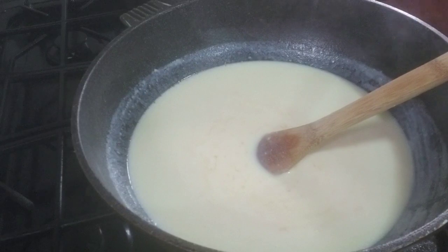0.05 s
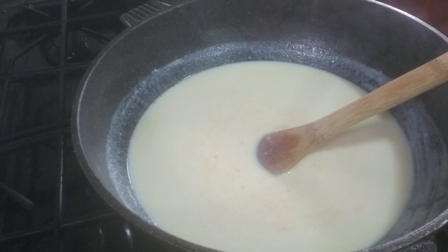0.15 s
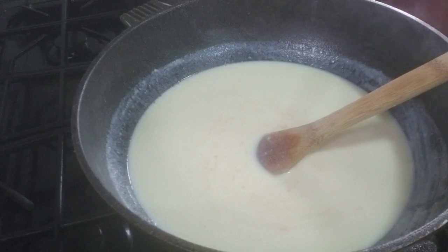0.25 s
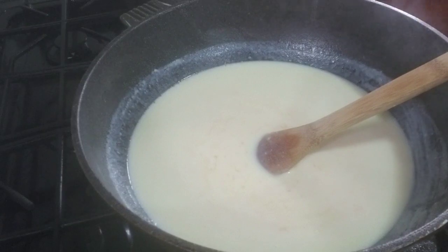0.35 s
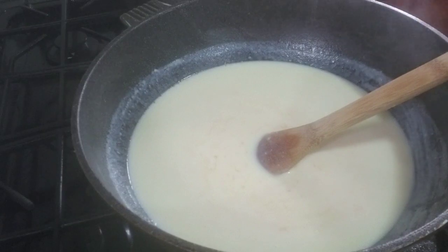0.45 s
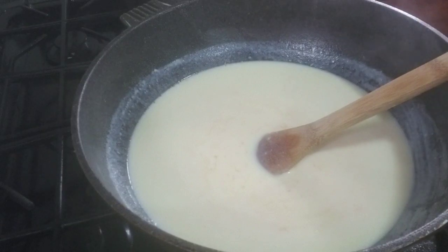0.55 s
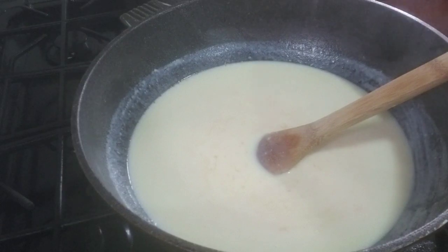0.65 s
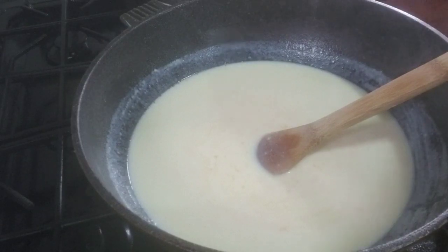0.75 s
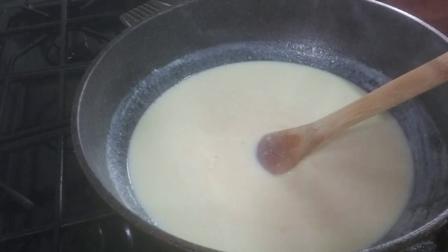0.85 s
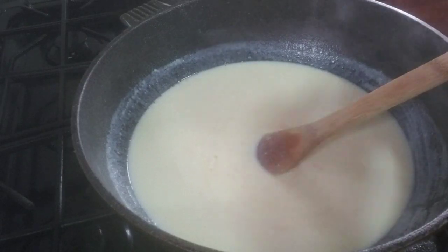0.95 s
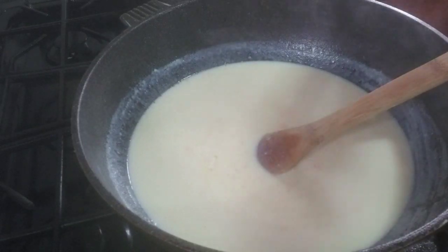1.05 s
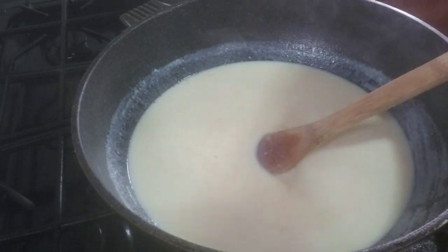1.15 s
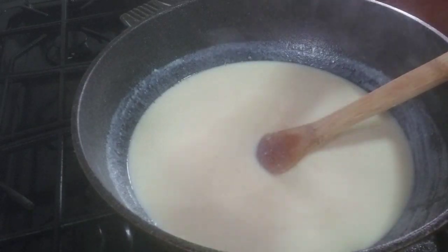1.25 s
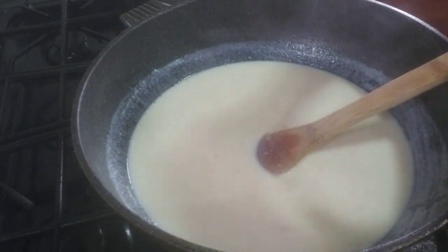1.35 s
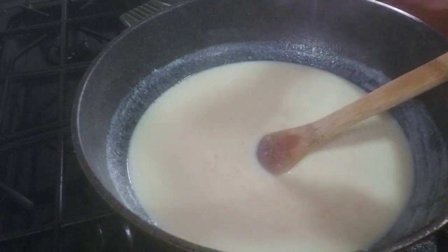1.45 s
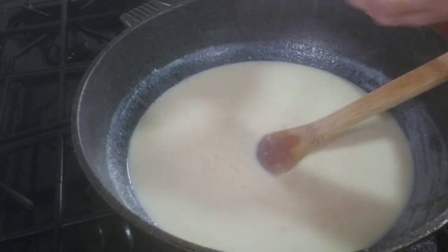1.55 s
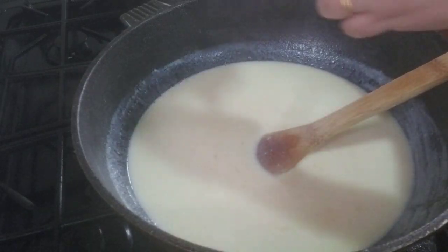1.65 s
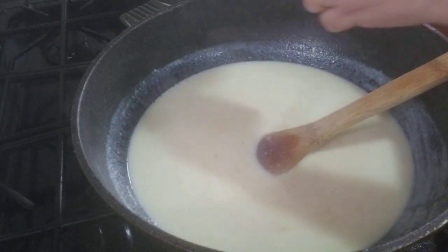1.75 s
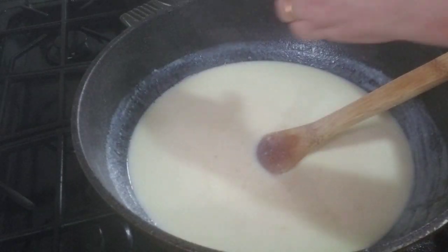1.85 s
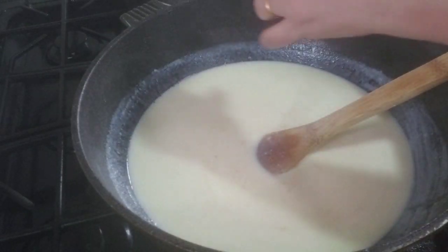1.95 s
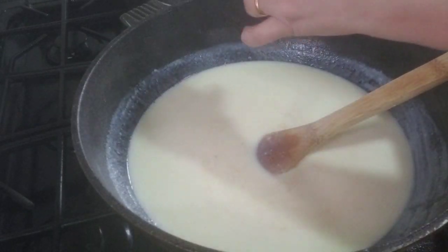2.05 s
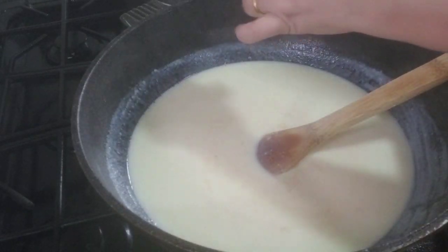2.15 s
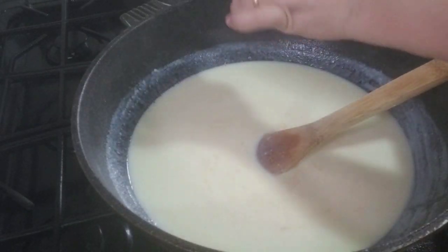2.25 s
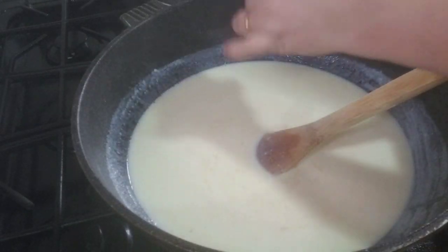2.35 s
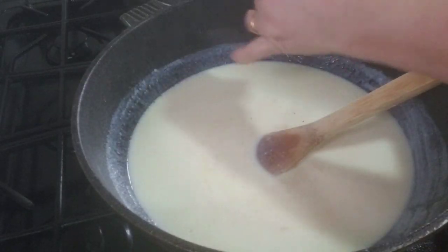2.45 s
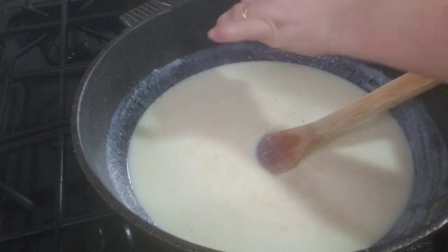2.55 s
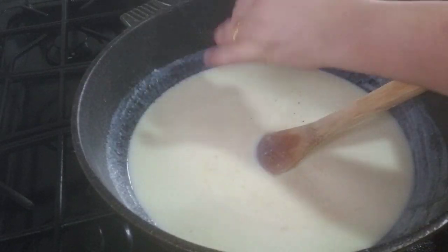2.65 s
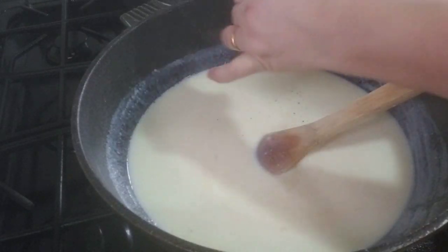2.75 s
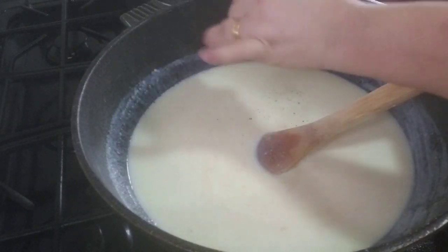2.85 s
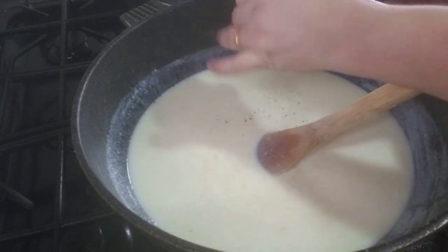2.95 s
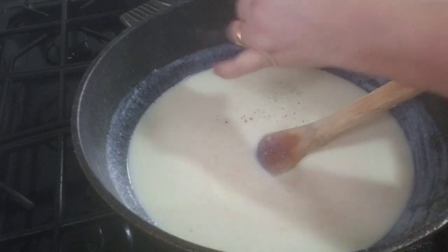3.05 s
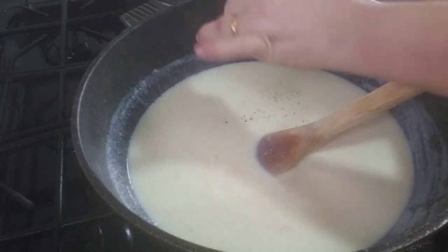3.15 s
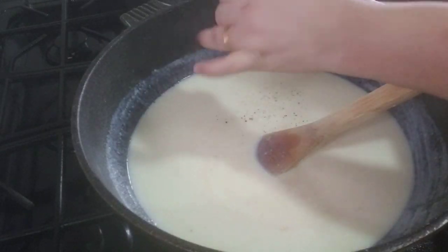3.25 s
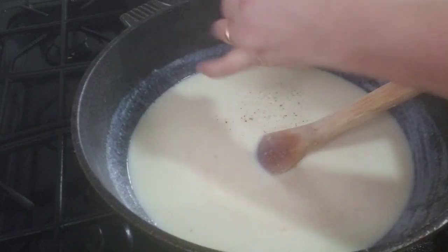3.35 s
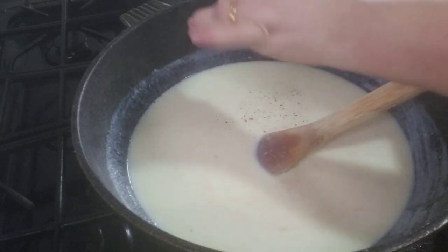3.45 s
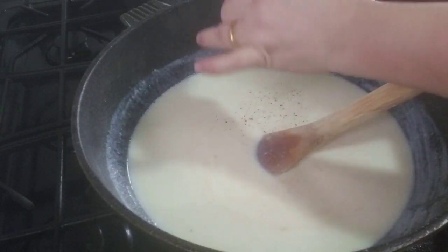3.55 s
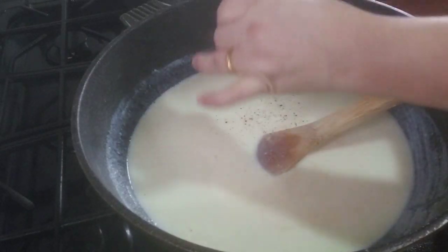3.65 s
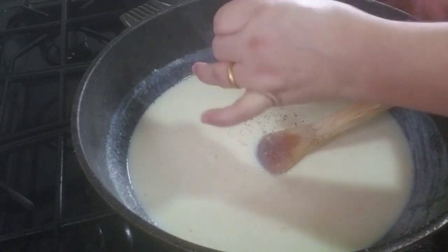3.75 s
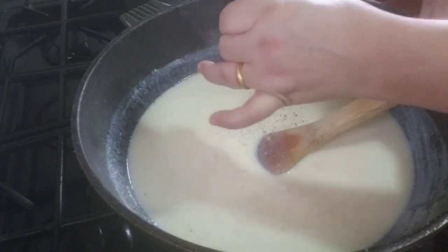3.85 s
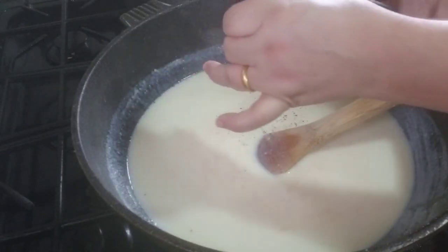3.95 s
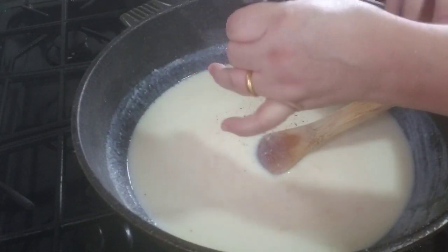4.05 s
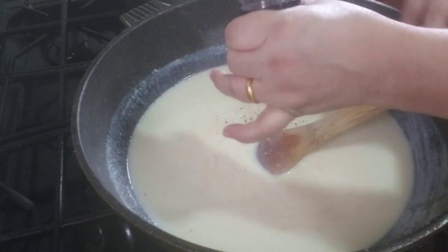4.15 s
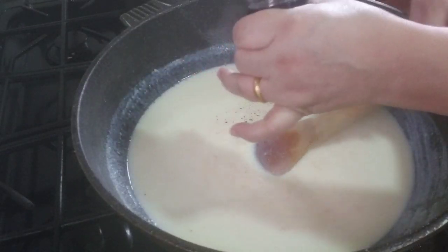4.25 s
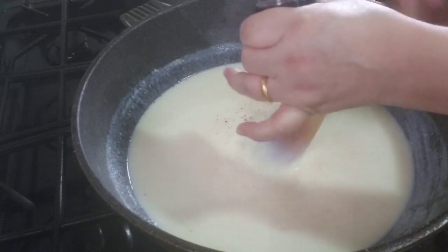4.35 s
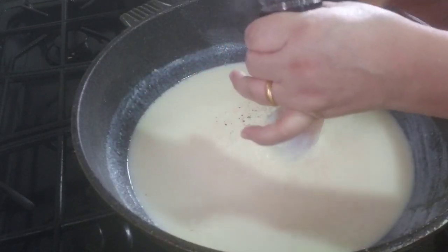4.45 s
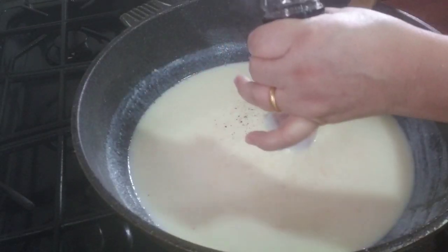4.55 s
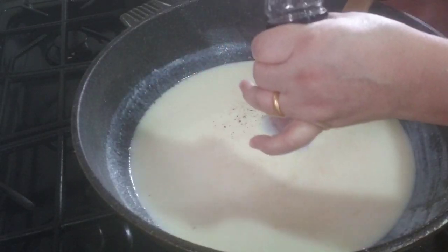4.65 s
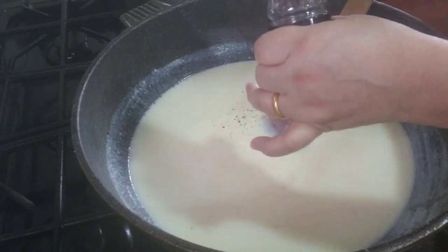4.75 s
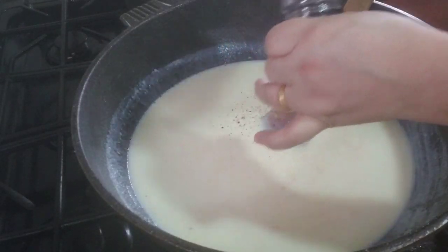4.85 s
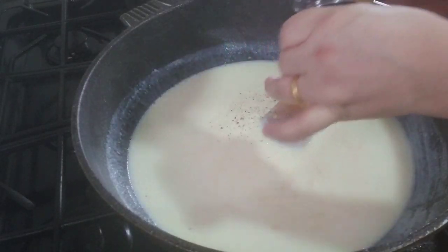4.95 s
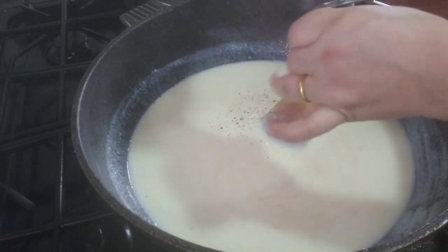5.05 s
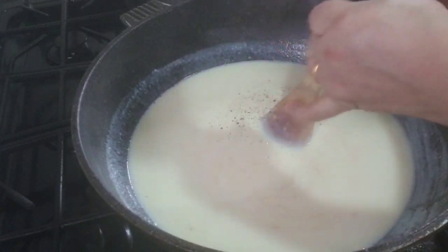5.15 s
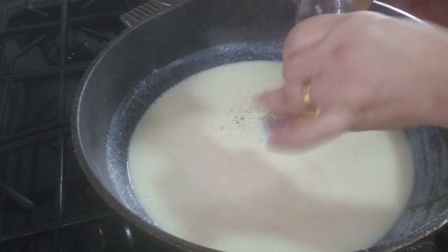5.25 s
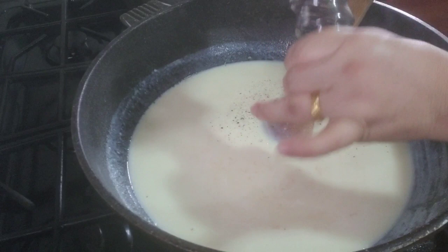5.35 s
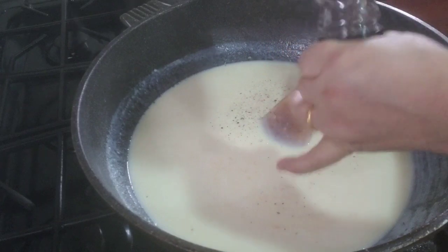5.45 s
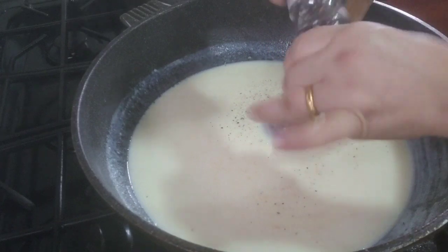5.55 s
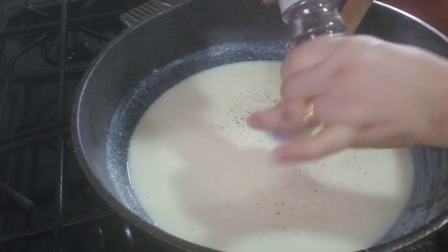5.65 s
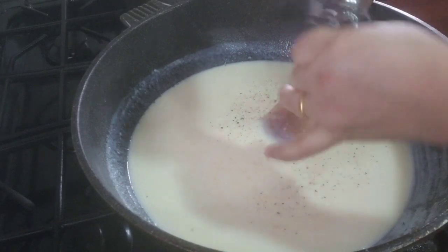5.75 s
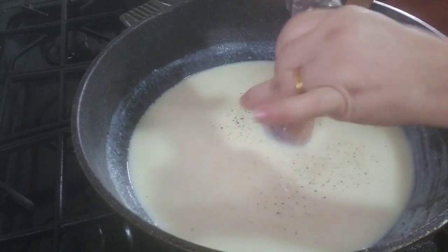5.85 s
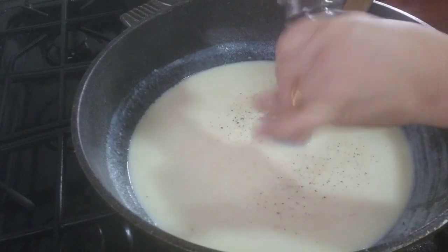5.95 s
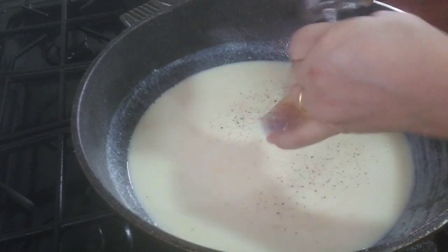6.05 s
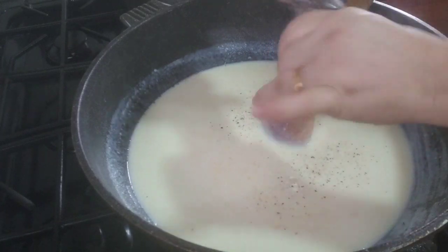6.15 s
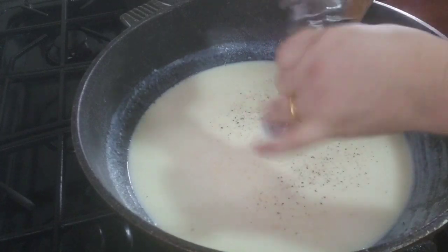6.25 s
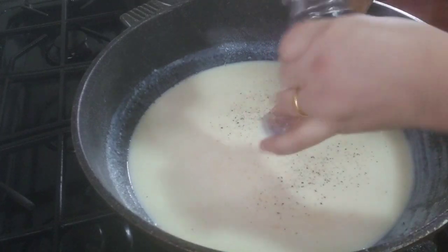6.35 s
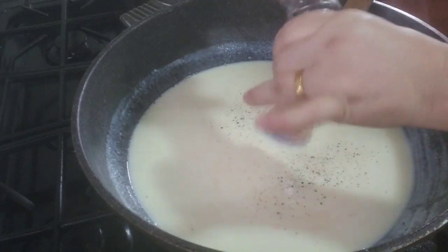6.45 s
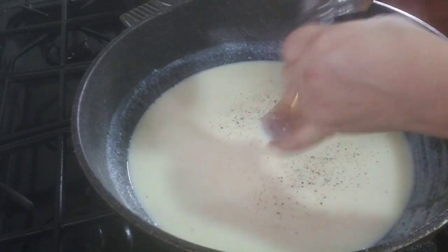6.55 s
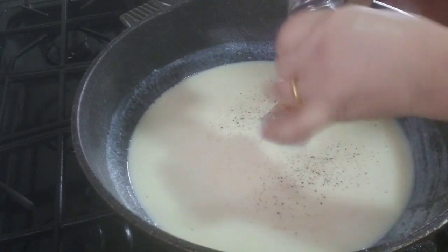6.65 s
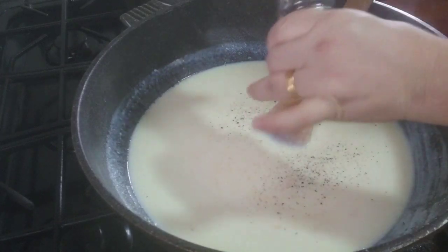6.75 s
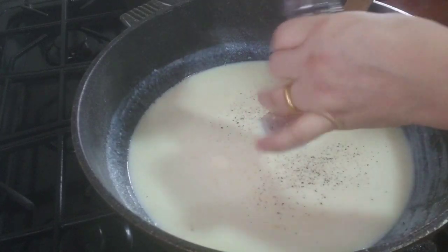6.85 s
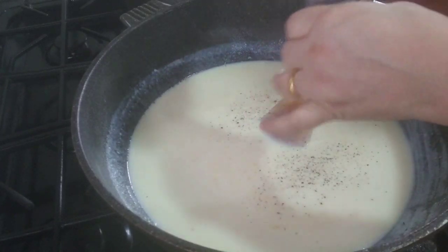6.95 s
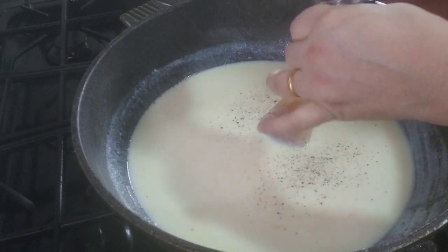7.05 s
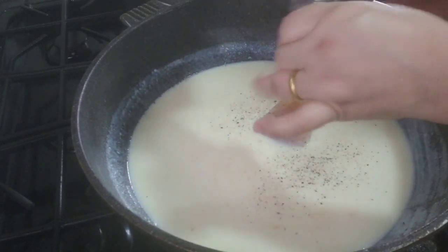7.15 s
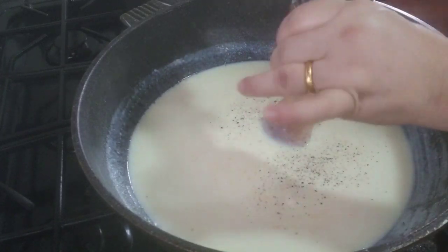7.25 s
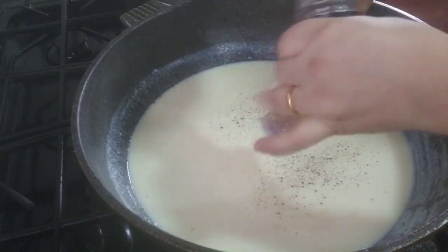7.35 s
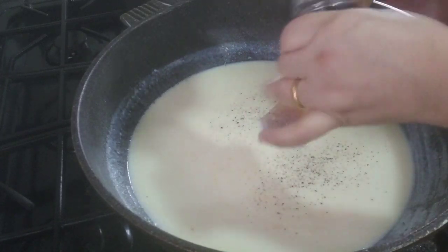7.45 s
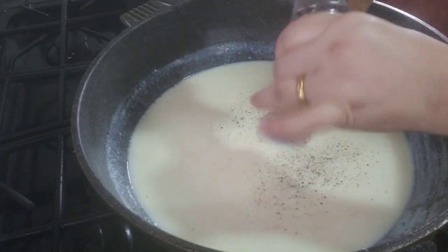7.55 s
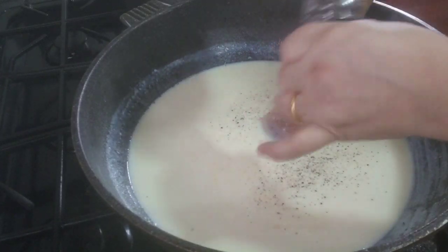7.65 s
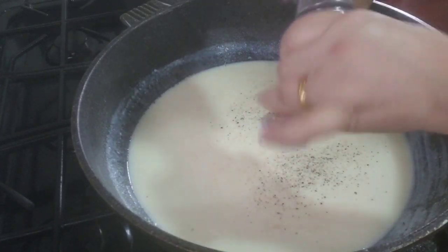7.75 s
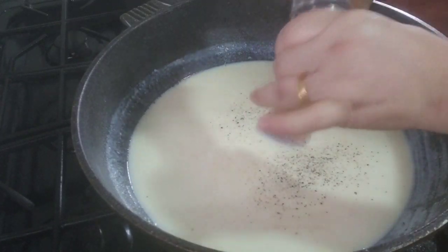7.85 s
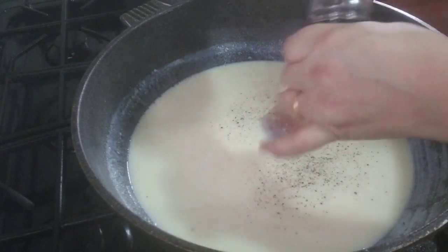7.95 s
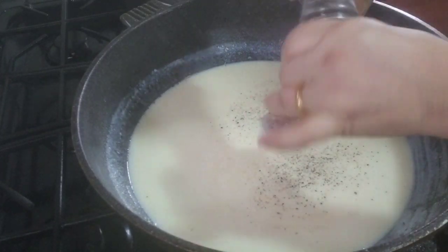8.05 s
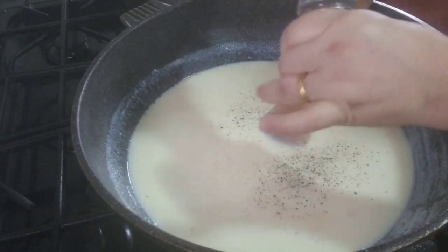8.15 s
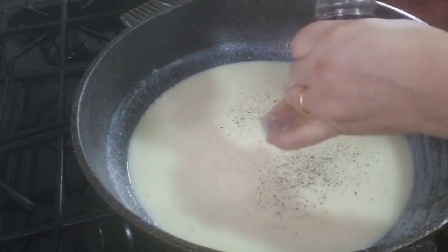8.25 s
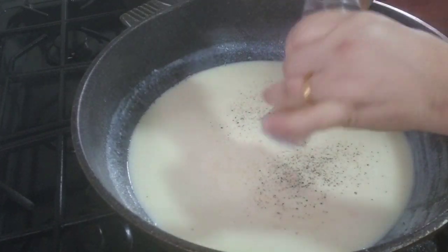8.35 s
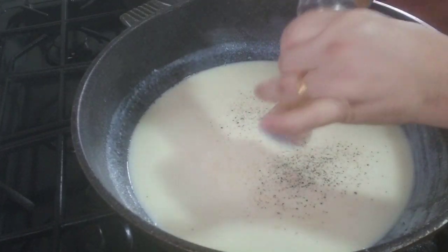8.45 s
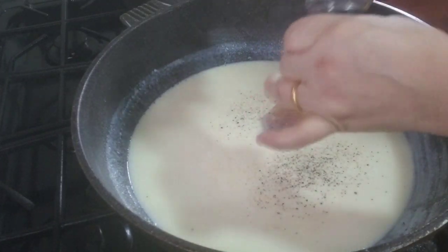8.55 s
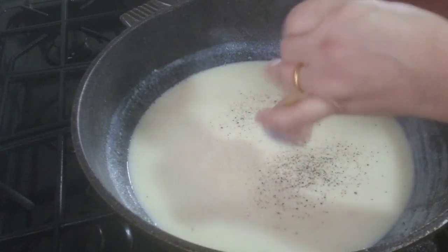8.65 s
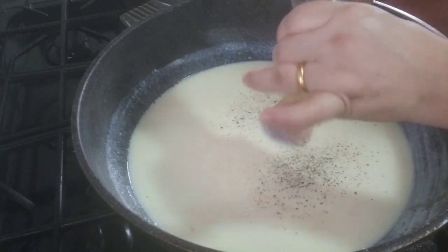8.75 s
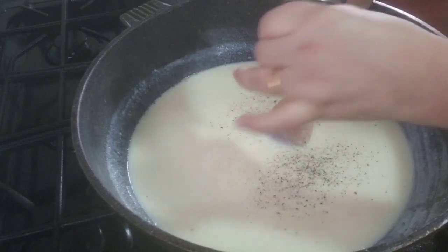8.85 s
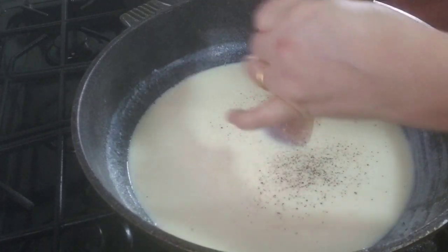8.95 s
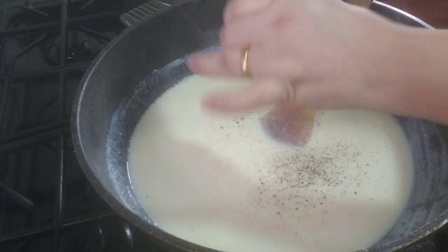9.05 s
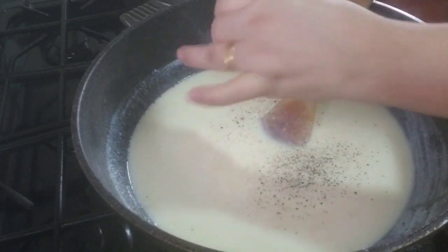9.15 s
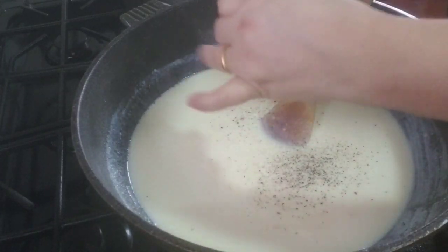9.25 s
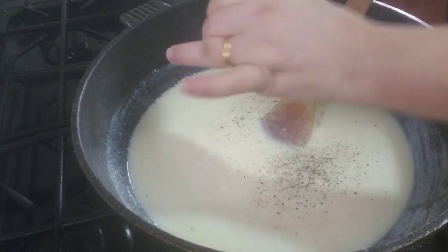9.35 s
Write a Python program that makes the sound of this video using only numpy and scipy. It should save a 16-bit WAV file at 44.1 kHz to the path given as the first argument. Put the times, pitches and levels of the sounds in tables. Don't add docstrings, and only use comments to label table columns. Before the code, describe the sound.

Close stereo pickup of a pepper mill turned in short strokes over a pan. Quiet airy hiss, dull thuds and a low hum precede thin glassy taps. Loud dry crackling bursts follow, bright and gritty with short pings from the shell, stop for about a second and a half around a small wood knock, then return in quick rhythmic strokes with a short tiled-room tail.

```python
import sys
import numpy as np
from scipy import signal
from scipy.fft import rfft, irfft
from scipy.io import wavfile
from scipy.ndimage import uniform_filter1d

SR = 44100
rng = np.random.default_rng(int(sys.argv[2]) if len(sys.argv) > 2 else 0)


def put_to_file(sound):
    columns = np.atleast_2d(sound).T
    safe = np.clip(columns, -1, 1)
    whole_steps = np.round(safe * 32767)
    wavfile.write(sys.argv[1], SR, whole_steps.astype(np.int16))


def volts(x):
    e = np.asarray(x, float) / 20
    return 10 ** e


N = 414540


def curve(table):
    s, *columns = np.transpose(table)
    return [np.interp(np.arange(N) / SR, s, column) for column in columns]


def unit(x):
    return x / np.sqrt(np.mean(x ** 2))


def colour(x, spectrum, peaks=()):
    size = 8192
    hz = np.arange(size // 2 + 1) * SR / size + 1
    points_hz, points_db = np.transpose(spectrum)
    db = np.interp(np.log(hz), np.log(points_hz), points_db)
    octaves_out = np.log2(np.maximum(hz / points_hz[-1], points_hz[0] / hz).clip(1))
    db = db - 24 * octaves_out
    for centre, width, lift_db in peaks:
        db = db + lift_db / (1 + (2 * (hz - centre) / width) ** 2)
    cepstrum = irfft(db * np.log(10) / 20)
    cepstrum[1:size // 2] *= 2
    cepstrum[size // 2 + 1:] = 0
    kernel = irfft(np.exp(rfft(cepstrum)))[:size // 4]
    kernel = kernel / np.linalg.norm(kernel)
    return signal.oaconvolve(x, kernel[None], axes=1)[:, :N]


def pair(alike):
    mid, side = rng.standard_normal((2, N))
    alike = np.clip(alike, 0, 1)
    opposite = np.array([[1], [-1]])
    return np.sqrt((1 + alike) / 2) * mid + np.sqrt((1 - alike) / 2) * side * opposite


def burst(hits, rise_s, fall_s):
    t = np.arange(int(8 * fall_s * SR)) / SR
    shape = (1 - np.exp(-t / rise_s)) * np.exp(-t / fall_s)
    return np.abs(signal.oaconvolve(hits, shape[None] / shape.max(), axes=1)[:, :N])


def place(times, left, right):
    hits = np.zeros((2, N))
    index = np.minimum((times * SR).astype(int), N - 1)
    np.add.at(hits, (slice(None), index), np.array([left, right]))
    return hits


def walk(rate):
    k = int(SR / rate)
    held = np.repeat(rng.standard_normal(N // k + 1), k)
    return unit(uniform_filter1d(held, k)[:N])


# time in seconds, gain in dB.
AIR_GAIN = [(0, 0.5), (1.6, 1), (2.5, 0), (3, -7), (3.6, -9), (4.2, -11), (4.55, -7), (4.75, -5),
            (5.2, 1.5), (6.6, -3), (7.2, -6.5), (8, -3.5), (9.4, -2.5)]
# frequency in Hz, density in dB per Hz.
HISS = [(100, -38), (170, -18), (376, -13), (528, -17.5), (591, -13), (896, -14.5), (1700, -32),
        (2830, -18), (3490, -28.5), (5490, -23), (9310, -33), (13800, -30.5), (15500, -61)]
# centre in Hz, width in Hz, lift in dB.
FLAME = [(2865, 95, 10), (592, 88, 2), (5400, 400, 0)]
# frequency in Hz, density in dB per Hz.
RUMBLE = [(12, -29), (20, -25.5), (34, -22), (70, 3), (100, -5), (135, -6.5), (170, -12), (260, -18),
          (340, -36)]
HISS_DB, RUMBLE_DB = -49.5, -51


def kitchen():
    gain_db, = curve(AIR_GAIN)
    hiss = colour(pair(0.24), HISS, FLAME) * volts(HISS_DB + gain_db + 1.9 * walk(5.1))
    rumble = colour(pair(0.91), RUMBLE) * volts(RUMBLE_DB + gain_db + 0.77 * walk(6))
    return hiss + rumble


# start in seconds, peak in dB, pitch in Hz.
BUMPS = [
    (0.113, -44.5, 182),
    (0.2, -45, 175),
    (0.612, -38.5, 153.5),
    (0.771, -42.5, 128),
    (0.802, -44, 125),
    (1.297, -42.5, 120),
    (1.936, -39, 135.3),
    (3.449, -47.5, 143.3),
    (4.272, -61, 140),
]


def bumps():
    s, peak_db, _ = np.transpose(BUMPS)
    puff = burst(place(s, volts(peak_db), volts(peak_db)), 0.0041, 0.024) * pair(0.85)
    out = volts(2.5) * colour(puff, [(60, -13.5), (150, -2.5), (500, -11.0), (1500, -28.0)])
    t = np.arange(SR // 4) / SR
    swell = np.exp(-t / 0.11) * (1 - np.exp(-t / 0.0037))
    for when, db, hz in BUMPS:
        out[:, int(when * SR):][:, :len(t)] += volts(db - 5.0) * np.sin(2 * np.pi * hz * t) * swell
    return out


# time in seconds, pitch in Hz, level in dB.
MOTOR = [
    (0.4, 67.25, -55),
    (0.63, 74.64, -37.5),
    (0.75, 81, -43),
    (1.02, 82.4, -38),
    (1.15, 82.2, -49.5),
    (1.31, 82.4, -37),
    (1.5, 84.75, -52),
    (2.09, 82.44, -46.5),
    (2.4, 83.0, -64),
]


def motor():
    fade_in, fade_out = (.3, MOTOR[0][1], -80), (2.6, MOTOR[-1][1], -80)
    hz, db = curve([fade_in, *MOTOR, fade_out])
    phase = 2 * np.pi * np.cumsum(hz) / SR
    octave = volts(-17.5 + 7.3 * walk(5.4)) * np.sin(2 * phase)
    return np.sqrt(2) * volts(db) * (np.sin(phase) + octave)


# frequency in Hz, density in dB per Hz.
GRIT = [(1290, -46), (2200, -11), (3180, -5.5), (3990, -2), (6360, -2), (7870, -5.5), (9340, -4),
        (12400, 3.5), (14500, -4.5), (15500, -40)]
# frequency in Hz, density in dB per Hz.
BODY = [(150, -100.5), (250, -62), (371, -18), (516, -18), (696, -13), (800, -13.5), (1070, -11),
        (2130, -3.5), (3200, -7), (4160, -22), (7040, -120)]
# centre in Hz, width in Hz, lift in dB.
MILL = [(1830, 232, 6.5), (1380, 380, 4), (7680, 1400, 9.5), (11540, 780, -3)]
SPLIT_HZ = 4750


def mill(top, middle, body, rise_s, fall_s):
    low = signal.butter(2, SPLIT_HZ, fs=SR, output="sos")
    high = signal.butter(2, SPLIT_HZ, "high", fs=SR, output="sos")
    bright = burst(top, rise_s, fall_s) * signal.sosfilt(high, pair(0.39))
    dull = burst(middle, rise_s, fall_s) * signal.sosfilt(low, pair(0.43))
    ring = burst(body, rise_s, 1.53 * fall_s) * pair(0.7)
    return colour(bright + dull, GRIT, MILL), colour(ring, BODY, MILL)


# start in seconds, peak in dB, dull part against it in dB.
TICKS = [(0.613, -30, -24), (0.8603, -43.5, 5.5), (1.059, -42, -16), (1.088, -47, -13), (1.0986, -41, -15),
         (1.1113, -32, -26), (1.1224, -48, -18), (1.1383, -43, -22), (1.1524, -49, -19), (1.1698, -22, -33),
         (1.181, -19.5, -39), (1.213, -24, -32), (1.22, -25, -23), (1.237, -23, -22), (1.2676, -30, -19),
         (1.3279, -39, -19), (1.3385, -23.5, -17), (1.3595, -38, -21), (1.3922, -46, -16),
         (1.4088, -42, -9), (2.052, -34.5, -6.5), (3.602, -30.5, -9.5), (3.7475, -54, -0.5),
         (3.7836, -49, -27), (3.8336, -51, -12), (3.8444, -39.5, -9), (3.9293, -45.5, -6),
         (4.0182, -51, -9), (4.869, -54, -9), (4.9116, -49, -14)]


def ticks():
    s, peak_db, dull_db = np.transpose(TICKS)
    ranges = [volts(peak_db + db) for db in (0, dull_db + 10.0, -26)]
    grit, body = mill(*[place(s, g, g) for g in ranges], 0.00013, 0.0019)
    return volts(1.5) * (grit + body)


# start in seconds, hold in seconds, crunch level in dB,
# load (body ring against the crunch) in dB.
STROKES = [(1.178, 0.11, -39.5, -22), (1.326, 0.087, -43.5, -19), (1.524, .11, -27.5, -20),
           (1.69, 0.026, -35.5, -18), (2.199, 0.061, -19, -9), (2.551, 0.018, -19, -2),
           (2.839, 0.038, -30, -8.5), (3.115, 0.048, -26.5, -4), (3.443, 0.054, -30, -9),
           (4.854, .1, -72, -23), (4.965, 0.049, -26, -13.5), (5.235, 0.045, -20.5, -5),
           (5.268, 0.061, -16.5, -11), (5.546, 0.047, -19, -9.5), (5.823, 0.076, -23, -7),
           (6.114, 0.074, -20, -10.5), (6.421, 0.057, -24.5, -11), (6.555, 0.036, -33, -7),
           (6.688, 0.063, -24, -11), (7.147, 0.11, -26.5, -9), (7.482, 0.076, -25, -13),
           (7.624, 0.085, -35.5, -8), (7.771, 0.03, -23.5, -7.5), (8.0, 0.038, -24, -24),
           (8.062, 0.05, -26.5, -8), (8.311, 0.088, -28, -7.5), (8.48, 0.067, -42.5, -28),
           (8.694, 0.05, -20.5, -8), (9.018, 0.081, -27, -6), (9.294, 0.23, -22, -9)]
# start in seconds, hold in seconds, crunch level in dB.
SHIFTS = [(1.764, 0.073, -44), (1.922, 0.018, -43), (2.12, 0.047, -38), (2.397, 0.21, -31),
          (2.694, 0.028, -34), (2.743, 0.077, -30), (2.984, 0.27, -40), (3.309, 0.057, -38),
          (3.376, 0.041, -33.5), (3.826, 0.027, -57), (5.096, 0.033, -30), (5.167, 0.087, -29),
          (5.417, 0.1, -30), (5.69, 0.041, -30), (5.775, .05, -29.5), (6.011, 0.093, -31.5),
          (6.271, 0.036, -32.5), (6.357, 0.057, -27.5), (6.625, 0.042, -28), (6.827, 0.021, -33),
          (6.932, 0.12, -41.5), (7.325, 0.073, -31.5), (7.425, 0.063, -29), (7.713, .05, -27.5),
          (7.926, 0.057, -33.5), (8.2, 0.093, -34), (8.59, 0.076, -37), (8.877, 0.019, -28.5),
          (8.94, 0.096, -29.5), (9.181, 0.15, -32)]
SHIFT_LOAD_DB = -14
GRIP_S, LET_GO_DB_PER_S = 0.02, 295
SETTLE_DB, SETTLE_DB_PER_S = -26.5, 56


def effort():
    t = np.arange(0, N / SR + .002, .001)
    moves = STROKES + [(*row, SHIFT_LOAD_DB) for row in SHIFTS]
    s, hold_s, db, load_db = np.transpose(moves)[:, :, None]
    after = np.maximum(t - s - hold_s, 0)
    ease = volts(-LET_GO_DB_PER_S * after) + volts(SETTLE_DB - SETTLE_DB_PER_S * after)
    twist = volts(db) * np.clip((t - s) / GRIP_S, 0, 1) * ease
    levels = [np.linalg.norm(g, axis=0) for g in (twist, twist * volts(load_db))]
    return [np.interp(np.arange(N) / SR, t, level) for level in levels]


# time in seconds, dull grit let through in dB,
# left against right in dB.
HOLD = [(1.1, -1.4, -0.5), (2.2, 2, -3), (2.9, 3, -3), (3.4, 1, -1.5), (5, -0.4, -2), (5.8, 1.2, -2),
        (6.6, 1.2, -1.8), (7.3, -0.3, -2.5), (7.73, -4, -1.7), (7.8, 1.5, -1.5), (8.02, -5, -1.5),
        (8.09, 0.1, -1.5), (8.3, -4, -1.5), (8.36, 1.3, -1.5), (8.9, -1.5, -1.5), (9.4, 0.5, -2.4)]


def crunch():
    crunching, ringing = effort()
    when, size, *tints = rng.random((10000, 5)).T
    size_db = np.minimum(-3.0 * np.log(1 - size), 8)
    ranges = [volts(size_db + 20.5 * (tint - .5)) for tint in tints]
    hits = [place(when * N / SR, g, g) * volts(2.5 * walk(35)) for g in ranges]
    hits[1] = hits[1] * volts(curve(HOLD)[0])
    grit, body = mill(*hits, 0.00043, 0.0029)
    return crunching * unit(grit) + ringing * unit(body)


# start in seconds, peak in dB,
# body ring against it in dB, dull grit against it in dB.
CRACKS = [(2.199, -3.5, -17, -12.5), (2.216, -4.5, -21, -7.5), (2.5428, -17, -7, -6),
          (2.558, -3, -16, -11.5), (2.8583, -9, -14.5, -7), (3.1268, -12, -16, -19),
          (3.4527, -8, -19, -12.5), (3.4575, -4, -12, -13), (5.1908, -3.5, -24.5, -26),
          (5.2689, -15, -15, -12), (5.2873, -7, -6, -7.5), (5.4214, -8.5, -21, -24),
          (5.5734, -11, -11, -14), (5.6003, -9, -17, -11.5), (5.8661, -11, -10.5, -6),
          (5.9152, -6.5, -20.5, -11.5), (6.0002, -8.5, -19, -16.5), (6.038, -10, -37, -29),
          (6.1564, -2.5, -13, -16), (6.4543, -14, -29, -10), (7.1578, -14, -9, -11.5),
          (7.1783, -18, -10, -11), (7.1916, -9.5, -9.5, -5), (7.5046, -2, -11, -11),
          (7.7867, -8.5, -8.5, -13), (8.0618, -15, -7.5, -9), (8.7014, -12.5, -10.5, -21),
          (9.041, -17, -8, -6), (9.0597, -16.5, -6.5, -4.5), (9.31, -14.5, -20, -21)]
# start in seconds, peak in dB.
CHIPS = [(1.527, -28), (1.5703, -17), (2.1825, -22), (2.2784, -15), (2.3865, -18.5), (2.4633, -18),
         (2.469, -20), (2.6945, -17), (2.7626, -20), (2.82, -15.5), (3.2924, -28), (4.9761, -20),
         (5.1005, -14), (5.1756, -16), (5.5463, -14), (5.7139, -18), (5.7967, -17), (6.3746, -23),
         (6.4105, -16), (6.588, -18), (6.6463, -19), (6.837, -15), (7.3297, -16.5), (7.442, -15),
         (7.5323, -17), (7.7323, -15), (8.014, -16.5), (8.073, -14), (8.175, -23), (8.299, -17),
         (8.314, -13), (8.6063, -27), (8.8853, -17), (8.943, -22), (8.979, -19), (9.1854, -20),
         (9.2933, -14)]
CHIP_RING_DB, CHIP_DULL_DB = -21.5, -25
# start in seconds, peak in dB,
# body ring against it in dB, dull grit against it in dB.
SNAPS = [(2.228, -10, -13, -12), (2.246, -8, -17, -11), (2.2726, -5.5, -13.5, -6.5), (2.415, -21, -12, -12),
         (2.5127, -21, -16, -12), (2.566, -9, -14, -12), (2.5794, -10, -16, -12.5), (2.5934, -8, -16, -12),
         (2.8424, -12, -13.5, -14), (3.0992, -18, -19, -12), (3.153, -15, -12, -12), (3.18, -10, -19, -8),
         (3.3318, -25, -15, -12), (5.0013, -13, -15.5, -13), (5.2407, -10, -15, -12),
         (5.2764, -7, -15, -11), (5.297, -9, -14, -12), (5.31, -8, -15, -12), (5.3284, -6, -13, -13),
         (5.5814, -12, -16, -12), (5.8464, -10, -11, -11), (5.895, -4.5, -15, -12), (6.0072, -14, -12, -12),
         (6.0906, -14, -17, -11), (6.1394, -7, -11, -12), (6.167, -5, -16, -12), (6.192, -10, -18, -12),
         (6.4707, -7.5, -16, -8), (6.7002, -22, -14, -12), (7.2314, -13, -15, -12), (7.351, -23, -14, -15),
         (7.4464, -20, -13.5, -12), (7.7927, -10, -13, -11), (7.8074, -9.5, -16, -11),
         (8.0296, -13, -13, -13), (8.0934, -18, -14, -12), (8.3567, -15, -12, -12), (8.7184, -16, -11, -12),
         (8.7375, -11, -15, -12), (8.8933, -15, -14, -15), (8.9565, -18.5, -14.5, -14),
         (8.998, -18, -19, -11), (9.0344, -16, -14, -10), (9.0826, -8.5, -15.5, -11.5),
         (9.0994, -18, -14, -10), (9.1144, -17, -12, -12), (9.3344, -12, -14, -15), (9.3738, -10, -15, -12),
         (9.3874, -11, -14, -12)]
SNAP_DB = -3.5
# frequency in Hz, density in dB per Hz.
THUD = [(250, -11.5), (400, -4.5), (650, 1.5), (950, -2), (1400, -20)]


def cracks():
    chips = [(s, db, CHIP_RING_DB, CHIP_DULL_DB) for s, db in CHIPS]
    snaps = [(s, db + SNAP_DB, *rest) for s, db, *rest in SNAPS]
    s, peak_db, ring_db, dull_db = np.transpose(CRACKS + chips + snaps)
    chance = rng.random((300, 7))[:len(s)].T
    side = np.tile(volts(4 * (chance[0] - .5)), 3)
    when = np.concatenate([s, s + 0.0033 * chance[1], s + 0.001 + 0.0033 * chance[2]])
    share_db = np.concatenate([-1.5 * chance[3], -2.5 - 3 * chance[4], -3.5 - 5 * chance[5]])
    ranges = [volts(np.tile(peak_db + db, 3) + share_db) for db in (-3, dull_db + 14.5, ring_db)]
    grit, body = mill(*[place(when, g * side, g / side) for g in ranges], 0.00038, 0.0014)
    jolt = volts(0.94 * (peak_db + ring_db + 13.0) - 39.0)
    thud = colour(burst(place(s, jolt, jolt), 0.00085, 0.0079) * pair(0.97), THUD)
    return volts(-6.0) * grit + volts(-5.0) * body + thud


# start in seconds, peak in dB, pitch in
# Hz.
SHELL_PINGS = [(2.1998, -15, 2714), (2.216, -12.5, 1570), (2.416, -27, 3140), (2.4632, -35, 3010),
               (2.495, -30, 1930), (2.5205, -26, 2020), (2.545, -21, 1680), (2.558, -13, 2960),
               (2.6941, -32, 2970), (2.8194, -29, 3290), (2.8603, -17, 1755), (3.103, -27.5, 3410),
               (3.1291, -23.5, 1930), (3.1356, -22.5, 2630), (3.1543, -19, 2490), (3.295, -36, 1760),
               (3.4275, -25, 3020), (3.457, -15, 2920),
               (5.1018, -29, 1830), (5.2467, -14, 1820), (5.2704, -8, 1760), (5.2874, -12, 2170),
         (5.2964, -17, 1690), (5.3114, -16, 2400), (5.3214, -19, 1850), (5.3364, -22, 1840),
         (5.4211, -27, 2350), (5.468, -31, 1820), (5.5603, -16, 1810), (5.5724, -18, 1860),
         (5.5834, -21, 2010), (5.6017, -17, 1990), (5.8471, -26, 1800), (5.8625, -20, 1720),
         (5.914, -21, 1486), (6.0003, -30, 1895), (6.1288, -23, 1800), (6.1399, -20, 1830),
         (6.1659, -14, 1890), (6.1774, -21, 1856), (6.4108, -22, 1960), (6.4702, -22, 1850),
         (6.6996, -25, 1780), (7.1581, -22, 1760), (7.1801, -21, 1860), (7.191, -15, 1845),
         (7.2294, -26, 2010), (7.3514, -33, 1890), (7.4859, -19, 1330), (7.5053, -11, 1354),
         (7.5294, -22, 1440), (7.6894, -28, 1820), (7.7927, -16, 1840), (7.8074, -20, 1310),
         (8.0614, -21, 1840), (8.094, -23, 1890), (8.1154, -28, 1920), (8.2277, -26, 1850),
         (8.3449, -29, 1830), (8.3574, -23, 1870), (8.7031, -16, 1770), (8.7194, -21, 1840),
         (8.7444, -21, 1860), (8.7634, -24, 2010), (8.8937, -26, 1830), (9.0349, -25, 1790),
         (9.0628, -20.5, 1365), (9.0833, -22, 1800), (9.0994, -24, 1780), (9.3352, -20, 1830),
         (9.3574, -19, 1800), (9.3844, -20, 1930)]
PING_T60_S, PING_DB = .028, -5.5


def pings():
    out = np.zeros((2, N + SR))
    t = np.arange(SR // 12) / SR
    fade = volts(-60 * t / PING_T60_S) * (1 - np.exp(-t / 0.00047))
    chance = rng.random((100, 3))
    for (s, db, hz), (apart, left, right) in zip(SHELL_PINGS, chance):
        turn = 2 * np.pi * hz * t
        start_phase = 2 * np.pi * np.array([[left], [right]])
        partner = np.sin(turn * (1 + 0.17 * (apart - .5)) + start_phase)
        ring = np.sin(turn) + 0.81 * partner
        out[:, int(s * SR):][:, :len(t)] += volts(db + PING_DB) * fade * ring
    return out[:, :N]


# frequency in Hz, level in dB, t60 in seconds.
KNOCK = [
    (365, -10, 0.077),
    (689, 0.5, 0.14),
    (888, -6.5, 5.0),
    (1080, -4.5, 0.17),
    (2170, -6, 5.0),
    (2340, -12, 0.15),
    (2830, -43, 5.0),
    (4020, -23, 5.0),
]
KNOCK_S, KNOCK_DB = 4.568, -35


def knock():
    t = np.arange(int(.3 * SR)) / SR
    ring = sum(volts(db) * np.sin(2 * np.pi * hz * t) * volts(-60 * t / min(t60, .12)) for hz, db, t60 in KNOCK)
    tap = place(np.array([KNOCK_S]), [1.], [1.])
    contact = [(300, -2), (1000, -1.0), (2500, -5.0), (7000, -20.5), (9000, -42)]
    tick = colour(burst(tap, 0.00027, 0.0079) * pair(0.22), contact)
    return volts(KNOCK_DB) * (signal.fftconvolve(tap, ring[None], axes=1)[:, :N] + volts(5.5) * tick)


ROOM_T60_S, ROOM_DB = 0.3, -3.5


def room(x):
    t = np.arange(int(.45 * SR)) / SR
    step = SR // 5
    out = np.zeros((2, N + step + len(t)))
    for start in range(0, N, step):
        noise = rng.standard_normal((2, len(t)))
        low = uniform_filter1d(noise, size=9, axis=1)
        tail = low * volts(-60 * t / ROOM_T60_S) + (noise - low) * volts(-60 * t / (0.95 * ROOM_T60_S))
        tail = tail * (1 - np.exp(-t / 0.0015))
        tail = tail / np.linalg.norm(tail, axis=1)[:, None]
        wet = signal.fftconvolve(x[:, start:start + step], tail, axes=1)
        out[:, start:start + wet.shape[1]] += wet
    return out[:, :N]


def shade(x):
    def band(low_hz, high_hz):
        sos = signal.butter(2, [low_hz, high_hz], "band", fs=SR, output="sos")
        return signal.sosfilt(sos, x)
    moved = -.1 * band(3000, 6000) + .12 * band(6500, 9500)
    return x + np.array([[1], [-1]]) * moved


def scene():
    pan_db = curve(HOLD)[1]
    grinding = crunch() + cracks() + ticks() + pings()
    near = grinding * volts(np.array([pan_db, -pan_db]) / 2) + knock()
    near[1] = np.roll(near[1], 3)
    return shade(near + volts(ROOM_DB) * room(near)) + bumps() + motor() + kitchen()


# frequency in Hz, depth in dB.
MASK = [(0, 38), (170, 36), (300, 36.5), (600, 35), (1000, 32), (1800, 39), (2200, 56.5)]


def starve(x):
    hz, _, z = signal.stft(x, SR, nperseg=2048, noverlap=1536)
    power = np.mean(np.abs(z) ** 2, axis=0)
    band = np.add.reduceat(power, np.arange(0, len(hz), 4))
    band = np.repeat(band, 4, axis=0)[:len(hz)]
    treble = power[hz > 2000].sum(axis=0)
    treble = np.maximum(treble, signal.lfilter([.3], [1, -.7], treble))
    under_db = 10 * np.log10(treble / (band + 1e-18))
    limit_db = np.interp(hz, *np.transpose(MASK))[:, None]
    keep = 1 / (1 + np.exp(np.clip((under_db - limit_db) / 0.5, -9, 9)))
    return signal.istft(z * keep, SR, nperseg=2048, noverlap=1536)[1][:, :N]


def band_limit(x):
    return signal.sosfilt(signal.butter(12, 15820, fs=SR, output="sos"), x)


def record(dry):
    rounded = np.tanh(1.05 * dry) / 1.1
    top = signal.ellip(7, .5, 34, 14550, fs=SR, output="sos")
    mix = starve(signal.sosfilt(top, rounded))
    return band_limit(mix)


dry = scene()
out = record(dry)
put_to_file(out)
```